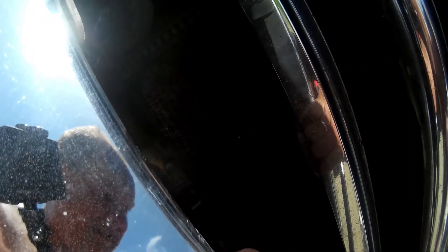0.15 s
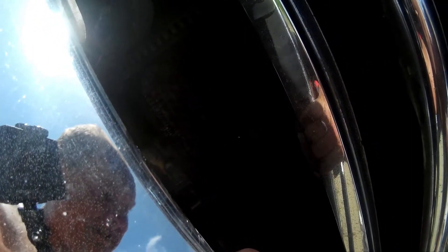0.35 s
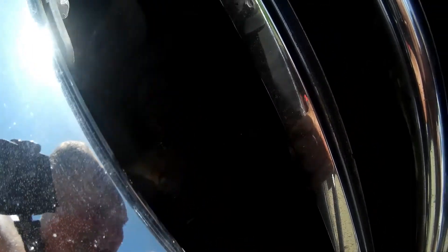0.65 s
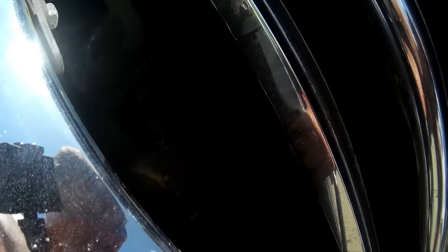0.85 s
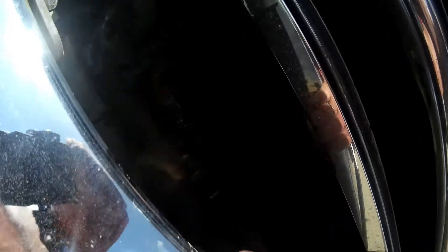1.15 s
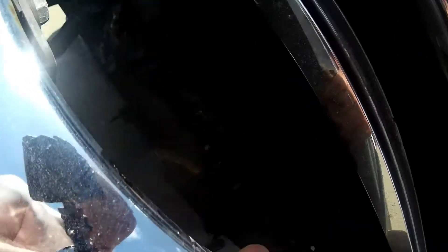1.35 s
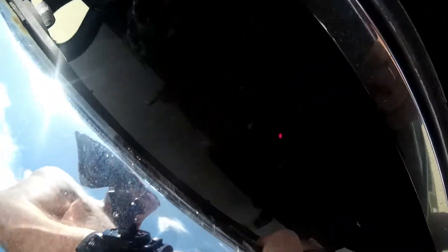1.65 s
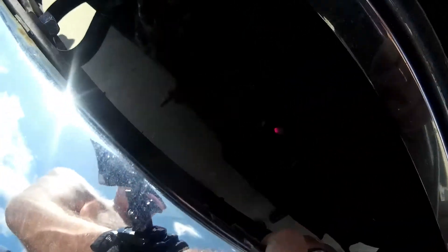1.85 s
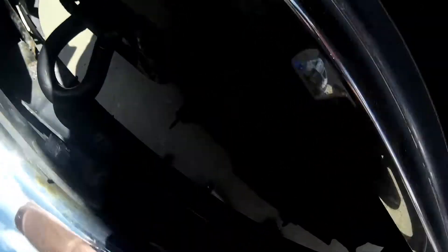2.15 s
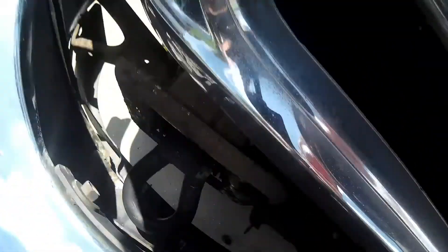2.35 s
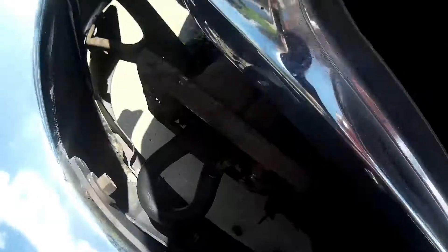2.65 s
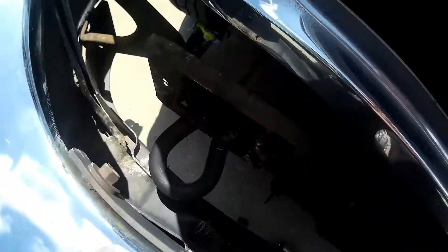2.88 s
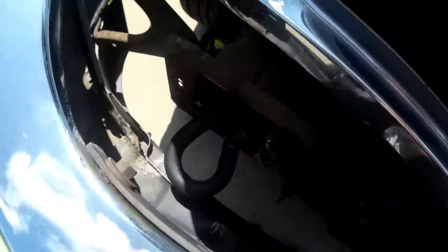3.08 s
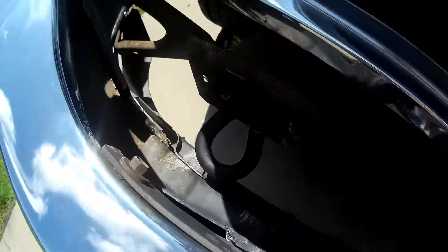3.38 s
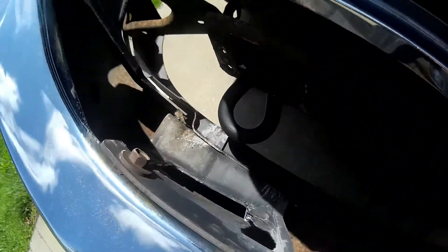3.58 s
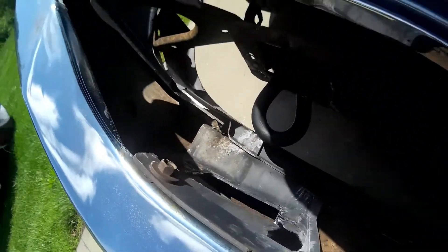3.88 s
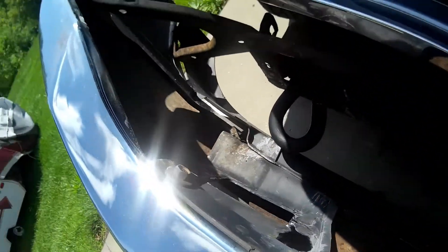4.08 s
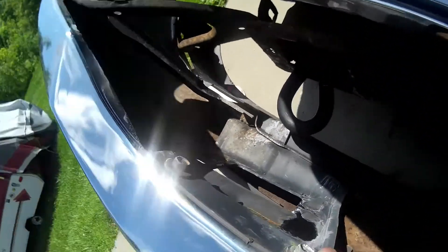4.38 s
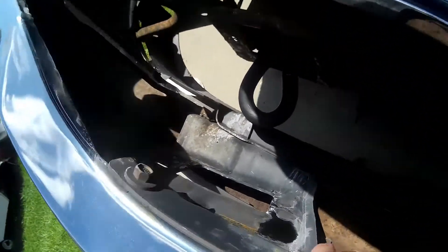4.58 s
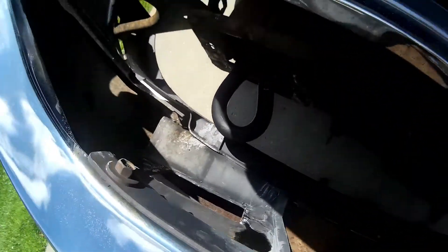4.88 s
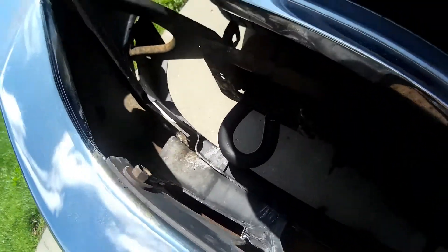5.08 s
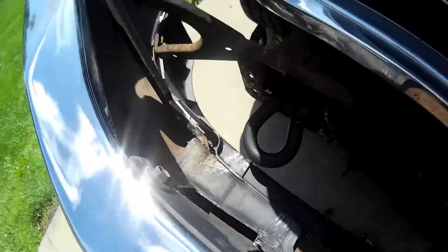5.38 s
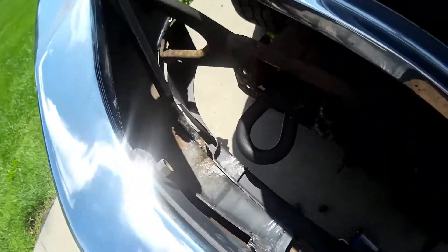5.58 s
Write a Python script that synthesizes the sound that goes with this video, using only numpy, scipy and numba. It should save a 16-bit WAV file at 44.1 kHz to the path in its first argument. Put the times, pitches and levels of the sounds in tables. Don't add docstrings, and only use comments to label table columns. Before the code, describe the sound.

Very close to the microphone, a metal tool taps faintly, then chatters and clanks against a steel bumper and brackets, peaking just after one second with brief squeaks. Sharp hollow snaps follow, then quieter fumbling, scraping and light ticks, before new bursts of ringing blows late on. Quiet outdoor yard behind, with low rumble, wavering hum and faint bird chirps.

```python
import sys
import numpy as np
from scipy import signal
from scipy.fft import rfft, irfft
from scipy.io import wavfile
from scipy.ndimage import uniform_filter1d
from numba import njit

SR = 44100
rng = np.random.default_rng(int(sys.argv[2]) if len(sys.argv) > 2 else 0)


def magnitude_from_level(level_db):
    exponent = np.asarray(level_db, float) / 20
    return 10 ** exponent


def int16_out(signal):
    q = np.round(np.clip(np.atleast_2d(signal).T, -1, 1) * 32767)
    wavfile.write(sys.argv[1], SR, q.astype(np.int16))


N = 252683
T = np.arange(N) / SR

# (frequency [Hz], density [dB per Hz])
YARD_SPECTRUM = [(15, -33.5), (25, 3.5), (120, -6), (185, -41.5), (714, -16), (775, -22.5), (988, -20),
                 (1190, -22), (4490, -26), (9070, -30), (9840, -28.5), (14400, -33), (16000, -34.5)]
# (time [s], level [dB])
HUM_LEVELS = [(0.0, -54), (0.65, -56.5), (1.2, -44), (1.45, -74), (1.8, -54.5), (2.25, -59), (2.49, -57),
              (2.59, -54.5), (3.45, -63.5), (3.77, -55), (3.88, -69), (4.13, -48), (4.34, -60), (4.47, -43),
              (5.23, -47), (5.46, -52), (5.73, -54)]
# (time [s], length [s], start pitch [Hz], end pitch [Hz], level [dB])
BIRD_CHIRPS = [
    (0.28, 0.058, 2400, 2460, -60),
    (0.397, 0.037, 2700, 3100, -58),
    (0.505, 0.045, 2340, 2440, -58),
    (0.543, .02, 2580, 2640, -58),
    (0.594, 0.095, 2590, 3300, -61),
    (1.504, 0.042, 2300, 2980, -54),
    (1.548, 0.051, 2610, 3220, -55),
]
# (time
# [s], peak [dB], pitch [Hz], T60 [s])
DULL_BUMPS = [(1.042, -31.5, 150.4, 0.27), (1.125, -39, 67, 0.2), (1.258, -17, 413, .12),
              (1.263, -28, 267, 0.11), (1.774, -42, 149, .1), (2.093, -21, 589, 0.12),
              (2.469, -17.5, 240, 0.041), (2.47, -33, 69, 0.11), (2.478, -28.5, 598, .14),
              (4.476, -40, 45, 0.34), (4.58, -36, 44.4, 0.21), (5.6, -34, 55.4, 0.43)]
# (frequency [Hz], width [Hz], level [dB])
BUMPER_MODES = [(397, 38, -3.5), (500, 35, 2.5), (616.7, 120, 0), (727, 33, -0.5), (808, 48, 1.5),
                (922.6, 96, 4), (1020, 100, 0), (1310, 95, 2.5), (1540, 150, -1.5), (1680, 63, 6.5),
                (1857, 175, 2.5), (2090, 320, 2), (2700, 540, -9)]
BRACKET_MODES = [1090, 1240, 1430, 1780, 2030, 2350, 2550, 2860, 3640, 3810, 3960, 4150, 4480, 5400]
TOOL_MODES = [2550, 3810, 3960, 4830, 5400, 6400, 7400]
# (frequency [Hz], density [dB per Hz])
GRIT_SPECTRUM = [(1470, -41), (2500, -0.5), (3210, -6), (3770, -0.5), (4730, -5.5), (7080, -12),
                 (9810, -20.5), (12300, -23.5), (16000, -44.5)]
# (time [s], pressure [dB])
FUMBLE_PRESSURE = [(0, -68.5), (.45, -67), (.68, -56.5), (1.0, -45), (1.38, -51), (1.58, -49.5),
                   (1.85, -65), (2.1, -58.5), (2.4, -58.5), (2.8, -61.5), (3.02, -68), (3.4, -56),
                   (3.95, -58), (4.4, -57.5), (4.85, -56.5), (4.98, -61.5), (5.3, -54.5), (5.73, -43.5)]
# (time [s], hold [s], pressure [dB], sharpness [dB], camera shake [dB])
SCRAPE_STROKES = [(0.732, 0.033, -36, -2.5, -36), (0.825, 0.046, -40, -2.5, -45.5),
                  (1.004, 0.066, -40.5, -6, -33.5), (1.134, 0.092, -36, -10, -41),
                  (1.284, 0.006, -20.5, -6.5, -37), (1.633, 0.02, -25, -1.5, -39),
                  (1.696, 0.03, -38.5, 2, -54), (1.394, 0.034, -37.5, 1, -53),
                  (2.417, .01, -45, -16.5, -40.5), (2.48, 0.0054, -72, -7, -36.5),
                  (2.517, 0.035, -48, -4, -41.5), (2.632, 0.16, -59.5, 7.5, -55),
                  (3.405, 0.087, -57, -5, -63.5), (4.098, 0.049, -40.5, -16.5, -38),
                  (4.471, 0.0034, -31.5, -25.5, -31.5), (4.538, 0.058, -42.5, -10, -46.5),
                  (4.617, 0.014, -45, 8.5, -58), (4.697, 0.0053, -24.5, -31, -37.5),
                  (4.743, 0.017, -26.5, 4.5, -41), (5.074, 0.049, -45.5, -0.5, -56),
                  (5.148, 0.02, -32, 4, -32), (5.376, 0.085, -39.5, -12, -43),
                  (5.593, 0.025, -30.5, -4, -29.5), (5.654, 0.04, -38.5, -6, -36.5),
                  (2.084, 0.0091, -36.5, -6.5, -64), (4.575, .09, -40.5, 3, -57),
                  (4.776, 0.027, -34, -8, -44), (5.413, 0.037, -50, 5.5, -59), (5.522, .06, -48, 3, -57),
                  (1.673, 0.0088, -31, 2, -55), (5.346, 0.0092, -59.5, 5.5, -58)]
# (time [s], length [s], pitch [Hz], peak [dB])
SQUEALS_AND_CLINKS = [(1.292, 0.02, 2300, -28), (1.394, 0.037, 1312, -19), (1.4, 0.022, 2620, -33),
                      (1.418, 0.042, 1680, -31.5), (1.686, 0.022, 1730, -21), (1.696, 0.029, 1300, -20.5),
                      (1.709, 0.017, 1735, -20.5), (1.73, 0.026, 1735, -23), (1.724, 0.03, 1400, -21.5),
                      (1.72, 0.035, 727, -29), (1.752, 0.027, 1400, -38), (1.708, 0.039, 947, -33),
                      (1.432, .025, 1312, -34), (1.3, .03, 1720, -32), (1.403, .02, 880, -28),
                      (.7065, 0.013, 992, -10), (.712, .046, 490, -19.5), (.892, .014, 1000, -34.5),
                      (1.182, .022, 1500, -28.5), (1.188, .032, 550, -29), (1.474, 0.011, 3700, -44),
                      (2.3915, 0.0048, 3050, -24.5), (2.4685, 0.0043, 2740, -22), (2.4685, .004, 4220, -21.5),
                      (.73, .014, 1030, -13.5), (.755, .028, 1030, -28), (.752, .016, 760, -23),
                      (4.567, 0.1, 2125, -27.5), (4.59, 0.11, 3790, -33), (4.634, 0.037, 1780, -21.5),
                      (4.726, 0.017, 2396, -21), (4.724, 0.085, 3810, -33), (4.774, 0.06, 735, -25.5),
                      (4.774, 0.039, 1430, -27), (4.606, 0.029, 1430, -30.5), (4.724, .045, 750, -23),
                      (5.385, 0.063, 6400, -55), (5.415, .035, 7400, -56), (5.42, .055, 3900, -48),
                      (5.42, 0.036, 2560, -47), (5.42, 0.086, 908, -43), (5.505, 0.15, 3940, -48),
                      (5.52, 0.054, 2030, -43), (5.59, .04, 5400, -53), (.43, 0.11, 1650, -57),
                      (3.49, 0.06, 2500, -52), (5.7, 0.039, 2120, -44), (1.69, 0.055, 3700, -40),
                      (2.65, .14, 2550, -52)]
# (time [s], peak [dB], main ring [Hz], weaker ring [Hz], length [s])
TOOL_DRAGS = [(0.705, -13.5, 572, 800, 0.013), (0.729, -17, 900, 486, 0.016),
              (0.997, -11.5, 1542, 507, 0.022), (4.722, -10, 729, 2300, 0.013),
              (1.394, -25.5, 899, 721, 0.04), (1.669, -19, 1680, 1240, 0.019),
              (1.68, -27, 1720, 944, 0.052), (4.075, -20.5, 505, 495, 0.051),
              (4.569, -26, 2170, 1020, 0.17), (4.606, -28, 1430, 2310, 0.068),
              (4.771, -22.5, 748, 1336, 0.05), (5.411, -32, 986, 856, 0.089),
              (5.508, -42, 860, 2050, 0.057)]
# (time [s], peak [dB], ring [Hz], T60 [s])
BRIGHT_CRACKS = [(0.7086, -26.5, 3720, 0.097), (0.7304, -32, 4350, 0.05), (0.9137, -37.5, 4230, 0.15),
                 (0.9989, -37.5, 2860, 0.042), (1.1436, -40, 2960, 0.076), (1.226, -26.5, 3880, 0.099),
                 (1.257, -12.5, 3400, 0.047), (1.285, -9.5, 3770, 0.07), (1.3942, -37, 3100, 0.17),
                 (1.5263, -43, 4220, 0.036), (1.6145, -25, 3410, 0.084), (1.6413, -9, 4130, 0.061),
                 (1.6711, -16, 3160, 0.08), (2.3544, -44, 7100, 0.072), (2.419, -36.5, 5500, 0.06),
                 (2.4277, -37, 3900, 0.028), (3.4531, -52, 4060, 0.1), (3.7705, -51, 4080, 0.08),
                 (4.084, -44, 4120, 0.057), (4.205, -39.5, 3810, .1), (4.215, -34.5, 4200, 0.077),
                 (4.4539, -38, 4100, 0.18), (4.568, -39.5, 3960, 0.12), (4.6018, -33, 4000, 0.08),
                 (4.6311, -21, 4140, 0.12), (4.6676, -11, 3960, 0.12), (4.7236, -14.5, 3860, 0.13),
                 (4.754, -14.5, 3740, 0.046), (5.1526, -26, 4140, 0.046), (5.338, -44, 4200, 0.081),
                 (5.425, -43, 3900, 0.13), (1.2343, -27, 2550, .04), (1.432, -42, 3640, 0.04),
                 (5.376, -41, 5400, 0.087), (5.5768, -40, 4200, 0.073), (5.655, -44, 3800, .06)]
# (time [s], peak [dB], low ring [Hz], upper ring [Hz])
LIGHT_TAPS = [(0.124, -48.5, 686, 980), (0.385, -42.5, 630, 930), (0.639, -47, 435, 1000),
              (1.125, -28.5, 474, 1363), (1.52, -31.5, 724, 1780), (1.972, -43.5, 590, 933),
              (3.102, -41.5, 742, 1840), (3.352, -37, 500, 960), (3.454, -37, 1103, 1930),
              (3.591, -34.5, 477, 950), (3.761, -40, 808, 1080), (4.199, -35, 1430, 2550),
              (4.306, -41, 768, 1900), (4.326, -39, 610, 887), (5.339, -39, 1400, 2100),
              (0.683, -37, 940, 1430), (0.765, -29, 816, 1020), (0.819, -37, 1000, 1390),
              (0.844, -29.5, 493, 1390), (0.973, -27, 496, 1490), (1.146, -30, 465, 2030),
              (2.736, -48, 870, 1430), (2.767, -40, 707, 2030), (2.845, -52, 600, 1970),
              (3.21, -51, 1950, 2500), (3.397, -45, 415, 1320), (3.42, -46, 458, 1310),
              (3.775, -38, 1090, 1900), (3.829, -56, 850, 1730), (3.933, -44, 1790, 2820),
              (4.05, -51, 886, 1900), (4.112, -26.5, 727, 1310), (4.41, -48.5, 1790, 2100),
              (5.029, -42, 900, 1090), (5.055, -36, 500, 2300), (5.137, -25, 1357, 2550),
              (5.168, -18.5, 1020, 2030), (5.255, -36, 727, 1510), (5.69, -37, 800, 2030)]
# (time [s], peak [dB], low ring [Hz], upper ring [Hz], upper ring level [dB])
HARD_BLOWS = [(0.895, -26.5, 860, 974, 17.5), (0.922, -21.5, 890, 989, 28), (0.936, -25, 850, 910, -2),
              (1.023, -14, 432, 1057, -10), (1.055, -22.5, 582, 930, -9), (1.183, -20.5, 474, 1330, -3),
              (1.225, -16.5, 1270, 2575, 1), (1.233, -21.5, 1310, 2530, 5), (1.255, 0, 688, 1310, 2.5),
              (1.269, -7.5, 897, 1680, -6), (1.285, -6, 1310, 2645, 5.5), (1.298, -7.5, 935, 1680, 1),
              (1.312, -30, 727, 1310, -1.5), (0.999, -11, 1437, 2860, -9), (1.005, -10, 480, 2145, -3),
              (4.674, -6.5, 824, 1330, -13), (4.693, -10, 824, 1820, -12), (4.732, -12, 790, 1596, 3),
              (4.757, -24, 840, 2350, -2), (1.652, -10.5, 625, 1680, 2.5), (5.387, -33.5, 727, 1430, -2),
              (5.605, -30, 500, 1240, 9), (1.613, -17.5, 560, 2010, -3), (1.639, -5, 674, 1680, 6),
              (1.645, -4, 747, 1537, 9.5), (1.657, -15, 720, 1670, 6), (2.427, -24.5, 500, 1173, 4),
              (4.078, -24, 870, 1700, 0.5), (4.452, -28, 810, 884, -27), (4.667, -3.5, 713, 290, 0),
              (4.681, -16, 780, 1360, -1), (4.744, -12.5, 844, 1428, 7), (5.159, -11, 498, 1430, -10),
              (5.177, -14.5, 516, 1030, -10), (5.37, -23.5, 500, 1240, -8.5), (5.578, -13, 678, 794, -0.5),
              (5.658, -16.5, 296, 902, -5)]
# (frequency [Hz], level [dB], T60 [s])
CASING_MODES = [(176, 8.5, 0.019), (2220, 1, 0.03), (2460, 1, 0.016), (2980, -2, .012), (3450, 0.5, 0.014),
                (3920, -6, .03), (4250, -4, 0.014), (4940, -1, 0.0202), (5370, 1, 0.024), (5690, 0.5, .03),
                (6240, -2.5, .015), (6770, 0.5, 0.024), (7470, -10, 0.013)]
# (frequency [Hz], level [dB], T60 [s])
CASING_WALLS = [(824, -13.5, 0.03), (1180, -15.5, 0.027), (1640, -15.5, 0.021), (1000, -24, 0.043),
                (615, -22.5, 0.059)]
# (time [s], peak [dB], thump [Hz], treble [dB], bass [dB])
CASING_SNAPS = [(2.089, 8, 835, -12.5, -25), (2.306, -29, 1180, -14, -5), (2.39, -2.5, 1000, -19, -44),
                (2.467, 3.5, 1333, -19, -64), (2.501, -27, 690, -18, -14), (2.534, -32, 670, -10.5, -14),
                (2.561, -19, 615, -35, -11), (2.62, -9, 946, -30, -53), (2.705, -38, 1227, 2, -17),
                (4.244, -16, 966, -26.5, -21.5), (5.221, -11.5, 680, -27, -22),
                (5.229, -15.5, 780, -32, -6), (5.626, -24, 750, -13, 4)]


def level(x, db):
    return x * magnitude_from_level(db) / np.sqrt(np.mean(x ** 2))


def band(x, lo_hz, hi_hz, order=2):
    return signal.sosfilt(signal.butter(order, [lo_hz, hi_hz], "band", fs=SR, output="sos"), x)


def colour(x, shape):
    hz, db = np.transpose(shape)
    f = np.maximum(np.arange(len(x) // 2 + 1) * SR / len(x), 1)
    gain = magnitude_from_level(np.interp(np.log(f), np.log(hz), db))
    return irfft(rfft(x) * gain, len(x))


def ring(hz, db, t60, size, phase=0):
    t = np.arange(size) / SR
    hz, db, t60, phase = (np.reshape(v, (-1, 1)) for v in (hz, db, t60, phase))
    decay = magnitude_from_level(db - 60 * t / np.maximum(t60, .004))
    return np.sum(decay * np.sin(2 * np.pi * hz * t + phase), axis=0)


def walk(rate):
    hold = int(SR / rate)
    steps = np.repeat(rng.standard_normal(N // hold + 1), hold)
    return 1.5 * uniform_filter1d(uniform_filter1d(steps, hold), hold)[:N]


def add(out, s, sound, peak_db):
    i = int(s * SR)
    out[i:i + len(sound)] += (sound * magnitude_from_level(peak_db) / np.abs(sound).max())[:N - i]


@njit
def svf(x, hz, width):
    y, b, l = np.empty(len(x)), 0., 0.
    for i in range(len(x)):
        g, k = np.tan(np.pi * hz[i] / SR), width / hz[i]
        v = (b + g * (x[i] - l)) / (1 + g * (g + k))
        b, l, y[i] = 2 * v - b, l + 2 * g * v, k * v
    return y


def bird():
    out = np.zeros(N)
    for s, length, from_hz, to_hz, db in BIRD_CHIRPS:
        hz = np.linspace(from_hz, to_hz, int(length * SR))
        breath = np.hanning(len(hz)) ** .5 * magnitude_from_level(2.8 * walk(175)[:len(hz)])
        add(out, s, breath * np.sin(2 * np.pi * np.cumsum(hz) / SR), db)
    return out


def hum():
    phase = 2 * np.pi * np.cumsum(118 + 3.73 * walk(30)) / SR
    hum_db = np.interp(T, *np.transpose(HUM_LEVELS)) + 1.2 * walk(25)
    return magnitude_from_level(hum_db) * np.sin(phase)


def yard():
    air = level(colour(rng.standard_normal(N), YARD_SPECTRUM), -56)
    return air + hum() + bird()


def camera():
    rustle_start_s, rustle_length_s, whine_hz = .6, .17, 9518
    gate = uniform_filter1d(((T - rustle_start_s) % 1 < rustle_length_s) * 1., 600)
    rustle = gate * level(band(rng.standard_normal(N), 2500, 15000, order=1), -61.5)
    whine = level(svf(rng.standard_normal(N), np.full(N, 1. * whine_hz), 40.), -77)
    return rustle + whine


def bumps(size=12000):
    out, t = np.zeros(N), np.arange(size) / SR
    for s, peak_db, hz, t60 in DULL_BUMPS:
        swell = 1 - np.exp(-t * hz * 2)
        add(out, s, ring([hz, 1.37 * hz], [0, -6], [t60, t60], size) * swell, peak_db)
    return out


def pressure():
    press_db_per_s, ease_db_per_s = 518.5, 334
    edge_db, grit_db, grit_slope = -3.5, -16, 1.5

    def layers(db, sharp_db, shake_db):
        return np.array([db, db + sharp_db + edge_db, db + grit_slope * sharp_db + grit_db, shake_db])

    hand_db = np.interp(T, *np.transpose(FUMBLE_PRESSURE))
    hand_shake_db = -54.5 + 0.38 * (hand_db - hand_db.mean())
    gains = magnitude_from_level(layers(hand_db, 0, hand_shake_db))
    for s, hold, db, sharp_db, shake_db in SCRAPE_STROKES:
        near = slice(max(int((s - .3) * SR), 0), int((s + hold + .4) * SR))
        t = T[near]
        shape = magnitude_from_level(-press_db_per_s * (s - t).clip(0) - ease_db_per_s * (t - s - hold).clip(0))
        stroke = magnitude_from_level(layers(db, sharp_db, shake_db))[:, None] * shape
        gains[:, near] = np.hypot(gains[:, near], stroke)
    return gains


def scrape():
    squeal_hz = 1430 * np.exp(.03 * walk(8.1))
    uneven_db = 2.0 * np.minimum(rng.exponential(size=N), 5) + 2.88 * walk(34.87)
    slips = (rng.random(N) < 2200 / SR) * rng.standard_normal(N) * magnitude_from_level(uneven_db)
    steel = np.zeros(N)
    for k, (hz, width_hz, db) in enumerate(BUMPER_MODES):
        drifting_hz = hz * (1 + 0.014 * walk(2.91))
        steel += (-1) ** k * magnitude_from_level(db) * svf(slips, drifting_hz, 1.42 * width_hz)
    body = level(band(steel, 320, 1477), 0)
    edge = level(band(steel, 1590, 3300, order=1), 0)
    edge += level(svf(slips, squeal_hz, 120.), -12)
    hiss = level(colour(slips + 2 * rng.standard_normal(N), GRIT_SPECTRUM), 0)
    streaks = sum(svf(slips, np.full(N, 1. * hz), 84.) * magnitude_from_level(10 * walk(18)) for hz in TOOL_MODES)
    hiss += level(streaks, -7.5)
    shake = level(band(rng.standard_normal(N) * magnitude_from_level(1.2 * walk(24)), 85, 295), 0)
    return np.sum(pressure() * [body, edge, hiss, shake], axis=0)


def squeals():
    out = np.zeros(N)
    grain, jitter = magnitude_from_level(3.5 * walk(150)), 1 + .009 * walk(330)
    halo_width, halo_db = -10, -8
    for k, (s, length, hz, db) in enumerate(SQUEALS_AND_CLINKS):
        part = np.arange(int(length * SR))
        own = part + k * 5000
        grip = np.sin(np.pi * (part / len(part)) ** 0.81) ** 0.62
        line = np.sin(2 * np.pi * np.cumsum(hz * jitter[own]) / SR)
        halo = np.sin(2 * np.pi * np.cumsum(hz * jitter[own] ** halo_width) / SR)
        add(out, s, grip * grain[own] * (line + magnitude_from_level(halo_db) * halo), db)
    return out


def cluster(hz, spread, db, t60, size):
    modes = np.r_[hz, np.array(BUMPER_MODES)[:, 0], BRACKET_MODES]
    luck, late = rng.uniform(-1.096, 1, (len(modes), 2)).T
    luck[0] = 1
    off = np.abs(np.log(modes / hz)) / spread
    near = (off < 1.6) & (off * spread > .035)
    near[0] = True
    swell = 1 - np.exp(-np.arange(size) / SR / 0.00015)
    mode_db = db - 9 * off ** .5 - 7 * off ** 2 + 2.2 * luck
    mode_t60 = t60 / (1 + .4 * off)
    return swell * ring(modes[near], mode_db[near], mode_t60[near], size, np.pi * late[near])


def chatter(rate, rise_s, t60, size):
    t = np.arange(size) / SR
    taps = (rng.random(size) < rate / SR) * rng.standard_normal(size)
    taps[int(rise_s * SR)] = 4.12
    return taps * np.minimum(t / rise_s, 1) * magnitude_from_level(-60 * t / t60)


def grit(size, t60):
    decay = magnitude_from_level(-60 * np.arange(size) / SR / t60)
    burst = colour(rng.standard_normal(size), GRIT_SPECTRUM) * decay
    return burst / np.abs(burst).max()


def drags(size=9000):
    out, t = np.zeros(N), np.arange(size) / SR
    for s, peak_db, main_hz, weaker_hz, length in TOOL_DRAGS:
        body = cluster(main_hz, 0.13, 0, 0.096, size=4500)
        body += cluster(weaker_hz, 0.71, -5, 0.064, size=4500)
        press = np.sin(np.pi * np.minimum(t / length, 1) ** 0.63).clip(0) ** .5
        slips = (rng.random(size) < 3000 / SR) * rng.standard_normal(size) * press
        add(out, s, signal.fftconvolve(body, slips)[:size], peak_db)
    return band(out, 320, 6000)


def cracks(size=6000):
    out = np.zeros(N)
    for s, peak_db, hz, t60 in BRIGHT_CRACKS:
        modes = cluster(hz, 0.1, 0, 0.029, size=1600)
        tool = signal.fftconvolve(modes, chatter(2000, 0.001188, t60, size))[:size]
        tool = band(tool / np.abs(tool).max(), 2000, 14000)
        add(out, s, tool + 3 * grit(size, t60), peak_db)
    return out


def snaps(size=9000):
    out, (hz, db, t60) = np.zeros(N), np.transpose(CASING_MODES)
    high = len(hz) - 1
    for s, peak_db, thump_hz, treble_db, bass_db in CASING_SNAPS:
        partials_hz = thump_hz * np.array([1, 1.16, 1.6, 2.3])
        thump = ring(partials_hz, [-4.5, -7.5, -4.5, -14.5], [0.014, 0.0048, 0.0037, 0.026], size)
        casing_db = -23 + .4 * peak_db
        thump += ring([598, hz[0]], [casing_db, bass_db + db[0]], [.14, t60[0]], size)
        thump += ring(*np.transpose(CASING_WALLS), size) * magnitude_from_level(0.18 * min(peak_db, 0))
        tick_hz = hz[1:] * rng.uniform(0.98, 1.01, high)
        tick = .5 * ring(tick_hz, db[1:], 0.65 * t60[1:], size, np.arange(high) * np.pi)
        tick += 0.86 * grit(size, 0.017)
        thump = -np.convolve(np.roll(thump, int(0.00063 * SR)), np.hanning(18))[:size]
        snap = thump / np.abs(thump).max() + magnitude_from_level(treble_db - 1.5) * tick
        add(out, s + 0.0015, snap, peak_db)
    return band(out, 330, 11500)


def knocks(size=6500):
    out = np.zeros(N)
    blow_t60_s, tap_t60_s, tap_upper_db = 0.092, 0.11, -5.5
    blows = [(*blow, blow_t60_s) for blow in HARD_BLOWS]
    blows += [(*tap, tap_upper_db, tap_t60_s) for tap in LIGHT_TAPS]
    for s, peak_db, low_hz, upper_hz, upper_db, t60 in blows:
        body = cluster(low_hz, .65, 0, 0.65 * t60, size)
        body += cluster(upper_hz, 0.68, upper_db, 0.42 * t60, size)
        push = np.convolve(chatter(1100, .001, 1.01 * t60, size), np.hanning(12))
        add(out, s, signal.fftconvolve(body, push)[:size], peak_db)
    return band(out, 349, 7500)


def scene():
    steel = knocks() + drags() + cracks() + scrape() + squeals()
    close = snaps() + bumps()
    t = np.arange(6000) / SR
    echo = band(rng.standard_normal(len(t)), 130, 3200, order=1) * magnitude_from_level(-60 * t / 0.22)
    wet = signal.fftconvolve(magnitude_from_level(-46) * steel + magnitude_from_level(-72.5) * close, echo)[:N]
    return (steel + close + wet + yard() + camera())[None]


def top_cut(x):
    return signal.sosfilt(signal.butter(12, 16320, fs=SR, output="sos"), x)


def record(dry):
    clipped = np.clip(dry, -.98, .98)
    mix = signal.sosfilt(signal.ellip(8, .2, 70, 16100, fs=SR, output="sos"), clipped)
    return top_cut(mix)


dry = scene()
out = record(dry)
int16_out(out)
```